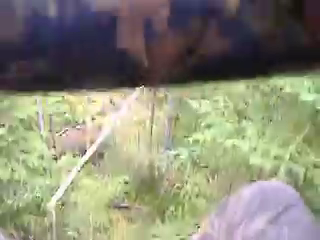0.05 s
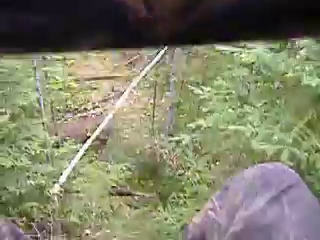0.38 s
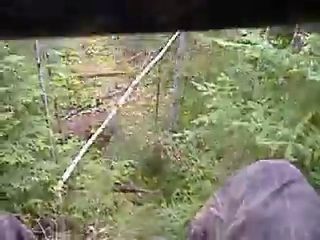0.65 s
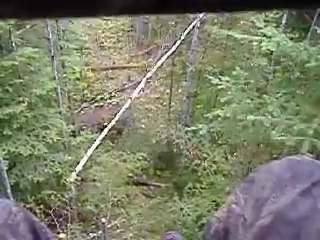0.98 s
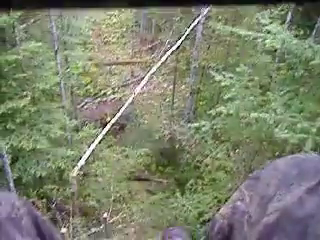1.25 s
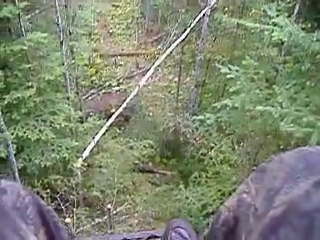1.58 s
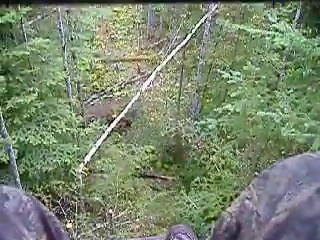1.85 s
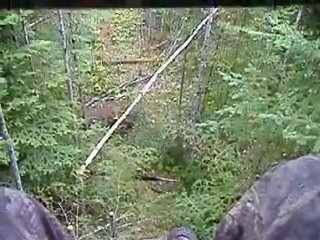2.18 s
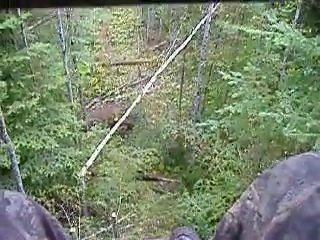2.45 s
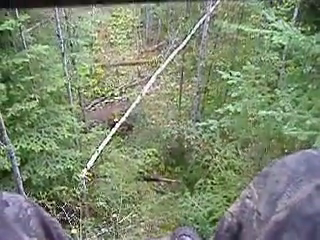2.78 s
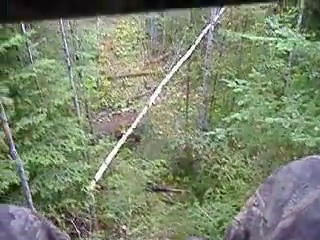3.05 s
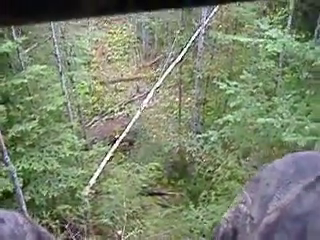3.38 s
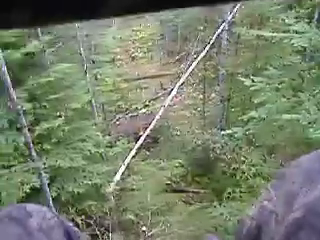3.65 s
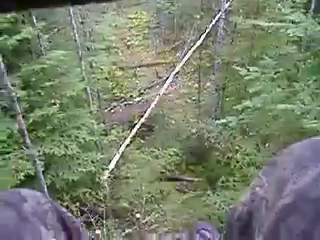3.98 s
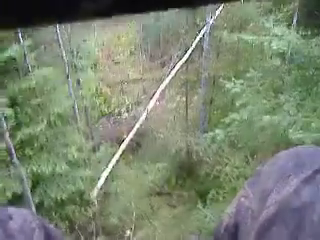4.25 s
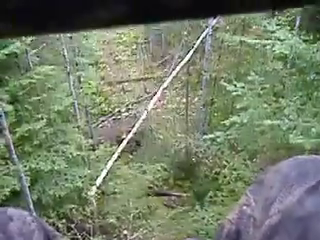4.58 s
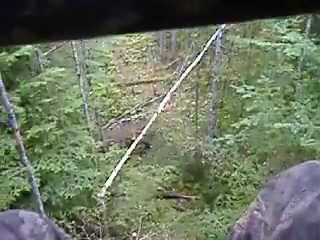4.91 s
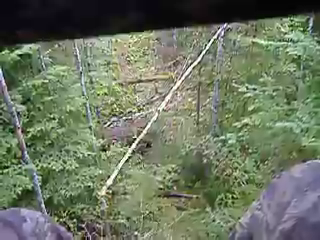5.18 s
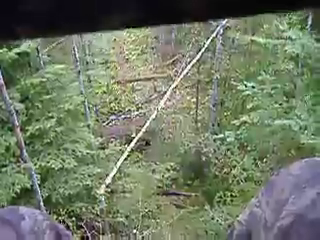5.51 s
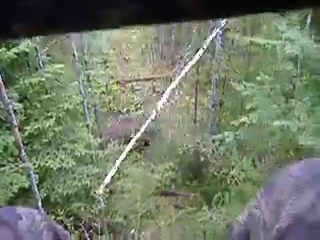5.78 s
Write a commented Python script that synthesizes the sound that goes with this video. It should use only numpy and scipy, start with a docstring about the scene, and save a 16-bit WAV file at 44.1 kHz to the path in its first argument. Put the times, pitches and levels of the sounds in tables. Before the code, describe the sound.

A faint steady hiss and a thin high whine run throughout, in a still forest. Close by on a tree stand, clothing rustles softly as hard-shelled gear is shifted. A sharp tap comes at 0.5 seconds and a dull bump at 0.8. A few faint ticks follow between 1.9 and 2.9 seconds, then a soft scrape and rustle. At 3.5 seconds a loud click leads into light scraping and a thin squeak. A small buckle clinks faintly at 4 seconds, just before two hard knocks on the metal rail at 4.1 and 4.2, ringing briefly, with a scrape, a short squeak and a low shudder. A quick double tap and a thin rasp follow at 4.5. The rail is knocked sharply again at 4.9 and 5.8 seconds, with lighter taps around the last knock. A sleeve brushes up close at about 6 seconds.

```python
"""Gear against a tree stand rail.

On a tree stand in a still forest, a small recorder sits within arm's reach. Clothing rustles as gear
is shifted: its hard shell taps, bumps, scrapes and squeaks, and four times knocks the metal rail, which
rings briefly under the hand. The recorder adds hiss and a thin whine, and clips on the hardest blows."""
import sys
import numpy as np
from scipy import signal
from scipy.fft import rfft, irfft, next_fast_len
from scipy.io import wavfile
from scipy.ndimage import map_coordinates

SR = 44100
rng = np.random.default_rng(int(sys.argv[2]) if len(sys.argv) > 2 else 0)


def store_wav(level_fs):
    """Save 16-bit WAV to argv[1]."""
    pcm = np.round(np.clip(np.atleast_2d(level_fs), -1, 1) * 32767)
    wavfile.write(sys.argv[1], SR, pcm.T.astype(np.int16))


N = 266364


def amp(db):
    """Decibels to gain."""
    return 10 ** (np.asarray(db) / 20)


def unit(x):
    """Scale to rms 1."""
    return x / np.sqrt(np.mean(x ** 2) + 1e-20)


def clock(count):
    """Sample times in seconds."""
    return np.arange(count) / SR


def fade(t, t60):
    """Exponential decay by 60 dB in t60 seconds."""
    return np.exp(-np.log(1000) * t / t60)


def filtered(x, response):
    """x through a gain that depends on frequency."""
    size = next_fast_len(len(x) + 8192)
    return irfft(rfft(x, size) * response(np.fft.rfftfreq(size, 1 / SR)), size)[:len(x)]


def coloured(x, spectrum):
    """x given a spectrum of (f/Hz, level/dB) points, at rms 1."""
    f, db = np.transpose(spectrum)
    return unit(filtered(x, lambda hz: amp(np.interp(np.log(hz + 1), np.log(f), db))))


def wobble(rate):
    """A smooth random curve, rate knots a second."""
    return map_coordinates(rng.standard_normal(int(N * rate / SR) + 4), [clock(N) * rate])


def ring(modes, t, length=1, pitch=1, scatter_db=0):
    """Damped modes after a blow; neighbours swing in opposite directions."""
    offset_db = scatter_db * rng.standard_normal(len(modes))
    return sum((-1) ** k * amp(db + offset_db[k]) * fade(t, t60 * length)
               * np.sin(2 * np.pi * hz * pitch * t) for k, (hz, db, t60) in enumerate(modes))


def add(track, s, sound):
    """Mix a sound into the track from time s."""
    part = track[round(s * SR):][:len(sound)]
    part += sound[:len(part)]


# noise floor spectrum: f/Hz, level/dB
HISS_SPECTRUM = [(12, -38), (20, -0.5), (62, -2), (133, -8.5), (297, -12), (355, -13.5), (573, -14.5),
                 (666, -13), (925, -16), (1100, -17), (2240, -20), (3030, -17.5), (5830, -18.5),
                 (7130, -18.5), (8300, -24.5), (10800, -16), (18300, -120)]
# tones of the recorder's electronics: f/Hz, rms level/dB
WHINE_TONES = [(7012, -59), (7290, -62.5), (7356, -69.5)]
def background():
    """Still forest air, microphone hiss and a thin electronic whine."""
    drift_db = 0.5 * wobble(2.4)
    hiss = amp(-45.5 + drift_db) * coloured(rng.standard_normal(N), HISS_SPECTRUM)
    whine = sum(amp(db) * np.sqrt(2) * np.sin(2 * np.pi * hz * clock(N) + 0.34 * wobble(7.4))
                for hz, db in WHINE_TONES)
    return hiss + whine


def fabric(spectrum, grain_db):
    """Cloth rubs in tiny uneven catches."""
    catches = rng.standard_normal(N) * amp(grain_db * wobble(350) + 1.05 * wobble(25))
    return coloured(catches, spectrum)


# spectra of rubbing clothes and of a close sleeve: f/Hz, level/dB
CLOTH_SPECTRUM = [(59, -31), (100, -0.5), (195, -20.5), (249, -7.5), (596, -5.5), (850, -8.5), (1150, -16),
                  (1700, -5), (2400, -16.5), (3450, -8.5), (4430, -15), (7190, -11), (8500, -15.5),
                  (11000, -39), (18700, -120)]
SLEEVE_SPECTRUM = [(100, -27), (850, -11.5), (1300, -16), (1900, -8), (3000, -5), (3900, -5), (5000, -12.5),
                   (8000, -16.5)]
# shifts of the body: peak t/s, level/dB, half length/s
BODY_SHIFTS = [(0.0, -44, 0.47), (0.785, -43, 0.14), (3.207, -47, 0.31), (4.097, -51.5, 0.65)]
def clothes(fidget_db=-57, nearest_s=6.04, swell_db_per_s=399):
    """Clothing rustles with each shift; at the end a sleeve swells as it nears the microphone."""
    t = clock(N)
    shift_power = sum(amp(db) ** 2 * np.exp(-2 * ((t - s) / half) ** 2) for s, db, half in BODY_SHIFTS)
    rustle = np.sqrt(amp(fidget_db) ** 2 + shift_power) * fabric(CLOTH_SPECTRUM, grain_db=2.5)
    sweep = amp(-18.5 - swell_db_per_s * np.abs(t - nearest_s))
    return rustle + sweep * fabric(SLEEVE_SPECTRUM, grain_db=1.5)


def crack(t, t60, low_hz, high_hz, hollow_hz=4550):
    """The noisy snap of a hard contact, with a hollow between the shell's upper modes."""
    band = signal.butter(1, [low_hz, high_hz], 'bandpass', fs=SR, output='sos')
    decay = fade(t, t60)
    snap = signal.sosfilt(band, rng.standard_normal(len(t)) * decay)
    snap -= 0.37 * signal.lfilter(*signal.iirpeak(hollow_hz, 4, fs=SR), snap)
    return unit(snap) * np.sqrt(np.mean(decay ** 2))


# modes of the gear's hard shell: f/Hz, level/dB, t60/s
SHELL_MODES = [(666, -11, 0.046), (813, -4, 0.041), (954, -8.5, 0.029), (1040, -13.5, .04),
               (1333, -2, 0.037), (1405, -3.5, 0.04), (1592, -12.5, 0.053), (1893, -11.5, 0.044),
               (2397, -7.5, 0.012), (2664, -15.5, 0.041), (3400, -14, 0.023), (3990, -30, 0.036),
               (4090, -29, 0.043), (5360, -16.5, 0.014)]
def tap(hardness, pitch):
    """One light contact: the harder it is, the more crack and the less ring of the shell."""
    t = clock(SR // 8)
    shell = ring(SHELL_MODES, t, length=0.6, pitch=pitch, scatter_db=2)  # the grip shortens the ring
    snap = crack(t, t60=0.012, low_hz=600, high_hz=6000, hollow_hz=3140)
    return amp(-5 - 14.5 * hardness) * shell + amp(-2 - 17.5 * (1 - hardness)) * snap


# the shell taps the rail: t/s, level/dB, hardness 0-1, pitch factor
SHELL_TAPS = [(0.4892, -8.5, .35, 1.11), (0.4961, -17, 0.8, 1.23), (1.8698, -26, 0.7, 0.96),
              (2.3192, -29, .65, 1.45), (2.407, -29, .6, 1.1), (2.8645, -21.5, 0.57, 1.0),
              (3.5257, -2.5, 0.52, 1.31), (3.6812, -25, 0, 1.05), (4.4573, -14, .95, 1.27),
              (4.463, -13.5, .75, 1.28), (5.542, -22, 0.68, 1.2), (5.84, -18, 0.7, 1.1),
              (5.9597, -17.5, 0.26, 0.99)]
def taps(tick_count=5):
    """Light contacts at changing spots sound only the shell; the gear also ticks faintly at random."""
    out = np.zeros(N)
    for s, db, hardness, pitch in SHELL_TAPS:
        add(out, s, amp(db) * tap(hardness, pitch))
    for when, size in rng.random((tick_count, 2)):
        add(out, when * N / SR, amp(-35.75 + 5 * size) * tap(hardness=1, pitch=1.32))
    return out


def thud(t, t60, top_hz):
    """The dull, pitchless shake of a contact."""
    band = signal.butter(2, [25, top_hz], 'bandpass', fs=SR, output='sos')
    return unit(signal.sosfilt(band, rng.standard_normal(len(t)))) * fade(t, t60)


# padded gear bumps the stand: t/s, level/dB, f/Hz
PADDED_BUMPS = [(0.7873, -22, 595), (2.7579, -25, 300), (3.5231, -17.5, 696), (4.15, -17, 750),
                (4.209, -12, 250), (4.321, -23, 700), (4.4531, -22.5, 520), (4.4643, -18.5, 940)]
def bumps(decay_cycles=6):
    """A padded contact gives one low, quickly dying push that stirs the stand and the shell."""
    out, t = np.zeros(N), clock(SR // 8)
    for s, db, hz in PADDED_BUMPS:
        push = np.sin(2 * np.pi * hz * t) * fade(t, decay_cycles / hz)
        shake = amp(-15) * thud(t, t60=0.075, top_hz=660)
        shell = amp(-7) * tap(hardness=0.25, pitch=1)
        add(out, s, amp(db) * (push + shake + shell))
    return out


def stroke(start, end):
    """Contact pressure rises and falls over one slide."""
    progress = np.clip((clock(N) - start) / (end - start), 0, 1)
    return np.sqrt(np.abs(np.sin(np.pi * progress)))


# shell modes that a slide excites: f/Hz, level/dB, t60/s
SLIDE_MODES = [(595, -8, 0.027), (828, -3, 0.024), (1385, 0, 0.013), (1913, -8.5, 0.019),
               (2790, -15, 0.011), (3450, -13.5, 0.0096)]
# grit spectrum: f/Hz, level/dB
GRIT_SPECTRUM = [(100, -12), (600, 4.5), (1100, -15), (1700, -7), (2400, 2.5), (3700, 4.5), (4500, -7.5),
                 (5300, -6.5), (6000, -2.5), (8000, -7.5)]
# the shell slides along the rail: start t/s, end t/s, level/dB, relative grit level/dB
RAIL_SCRAPES = [(2.98, 3.432, -47.5, -14), (3.533, 3.567, -38, -8), (3.61, 3.693, -43.5, -18),
                (3.688, 3.876, -40.5, -6), (4.094, 4.173, -32, -17), (4.156, 4.215, -22, -3),
                (4.21, 4.353, -45, -3.5), (4.448, 4.544, -40.5, -4.5), (4.616, 4.714, -47, -15)]
def scrapes():
    """Sliding contact is a dense run of tiny slips that shake the shell and hiss with grit."""
    slips = rng.standard_normal(N) * amp(2.6 * wobble(400) + 0.88 * wobble(70))
    shell = unit(signal.fftconvolve(slips, ring(SLIDE_MODES, clock(SR // 8)))[:N])
    grit = coloured(slips, GRIT_SPECTRUM)
    return sum(amp(db) * stroke(start, end) * (shell + amp(grit_db) * grit)
               for start, end, db, grit_db in RAIL_SCRAPES)


# the platform's rumble spectrum: f/Hz, level/dB
PLATFORM_SPECTRUM = [(15, -5), (35, 7), (70, -5.5), (125, -3), (250, -19.5), (500, -39), (1500, -87)]
# jolts underfoot: start t/s, end t/s, level/dB
PLATFORM_JOLTS = [(3.516, 3.695, -45), (4.15, 4.26, -34.5), (4.258, 4.34, -49), (5.786, 5.836, -41)]
def shudder():
    """Heavier shifts of the gear shake the platform and reach the microphone as a low rumble."""
    shaking = sum(amp(db) * stroke(start, end) for start, end, db in PLATFORM_JOLTS)
    return shaking * coloured(rng.standard_normal(N), PLATFORM_SPECTRUM)


# slips locked onto one resonance: start t/s, end t/s, f/Hz, peak rms level/dB, phase wander/rad
SLIP_SQUEAKS = [(3.708, 3.823, 5200, -46.5, 1.8), (4.164, 4.182, 787, -19.5, .4),
                (4.165, 4.204, 1376, -22, 0.45), (4.464, 4.537, 5150, -43, 1.9)]
def squeaks(steady_cycles=6):
    """Stick and slip gives a short unsteady tone under pressure and a thin rasp in a light slide."""
    out = np.zeros(N)
    for start, end, hz, db, wander in SLIP_SQUEAKS:
        phase = 2 * np.pi * hz * clock(N) + wander * wobble(hz / steady_cycles)
        out += amp(db) * stroke(start, end) ** 2 * np.sqrt(2) * np.sin(phase)
    return out


# buckle modes: f/Hz, level/dB, t60/s
BUCKLE_MODES = [(2000, 6, 0.014), (2860, 2, .035), (4240, 5, .04)]
# its clinks: t/s, level/dB
BUCKLE_CLINKS = [(4.0086, -39), (4.0583, -45)]
def buckle():
    """A small buckle clinks in a few high, short-lived modes."""
    out = np.zeros(N)
    for s, db in BUCKLE_CLINKS:
        add(out, s, amp(db) * ring(BUCKLE_MODES, clock(SR // 8), scatter_db=4.5))
    return out


# the rail above its lowest bending mode: f/Hz, level/dB, t60/s
RAIL_MODES = [(932, -26.5, 0.35), (1181, -2, 0.15), (1280, -10, .11), (1830, -24, 0.2), (2170, -21, 0.16),
              (2640, -29, 0.072)]
# blows on the rail: t/s, level/dB of each part (shell, crack, thud, bending mode, upper modes),
# then for the bending mode: f/Hz, ring length factor, relative hum level/dB
RAIL_KNOCKS = [(4.0801, -6, -3, -30.5, -12.5, -16, 533, 0.89, -27),
               (4.1981, -6, -1.5, -24.5, -18.5, -9.5, 511.6, 1.2, -43),
               (4.868, -8, -1, -39, -11, -15, 536.5, 0.8, -28),
               (5.7955, -6, -5.5, -25, -4, -14.5, 534, 0.57, -49)]
def knocks():
    """The shell cracks at once; the rail takes a few cycles to swell, then rings on."""
    out, t = np.zeros(N), clock(SR // 2)
    swell = 1 - np.exp(-(t / 0.013) ** 2)
    for s, shell_db, crack_db, thud_db, bend_db, upper_db, bend_hz, length, hum_db in RAIL_KNOCKS:
        snap = amp(crack_db - 4.5) * crack(t, t60=0.0091, low_hz=900, high_hz=5500)
        snap_tail = amp(crack_db - 27) * crack(t, t60=0.093, low_hz=300, high_hz=2200)
        shell = amp(shell_db - 1.5) * ring(SHELL_MODES, t, scatter_db=-0.1)
        # the gear's weight holds the bending mode flat until it springs clear
        turns = bend_hz * np.cumsum(1 - 0.13 * fade(t, 0.034)) / SR
        # that mode loses most of its swing quickly and keeps a faint hum
        bend = np.sin(2 * np.pi * turns) * (fade(t, 0.13 * length) + amp(hum_db) * fade(t, 0.7))
        upper = ring(RAIL_MODES, t, scatter_db=2.5)
        rail = amp(3.5) * swell * (amp(bend_db) * bend + amp(upper_db) * upper)
        shake = amp(thud_db) * thud(t, t60=0.13, top_hz=534)
        add(out, s, shell + snap + snap_tail + shake + rail)
    return out


def scene():
    """Gear and clothing within arm's reach of one microphone, in open air."""
    gear = taps() + bumps() + scrapes() + shudder() + squeaks() + buckle() + knocks()
    return (background() + clothes() + gear)[None]


def record(dry):
    """The small recorder's narrow-band input stage overloads on the tallest peaks."""
    corner_hz, band_hz, top_hz, full_scale = 8150, 8915, 16000, 0.74
    narrow = filtered(dry[0], lambda hz: (hz < band_hz) / np.sqrt(1 + (hz / corner_hz) ** 64))
    clipped = np.clip(narrow, -full_scale, full_scale)
    return filtered(clipped, lambda hz: hz < top_hz)[None]


dry = scene()
out = record(dry)
store_wav(out)
```